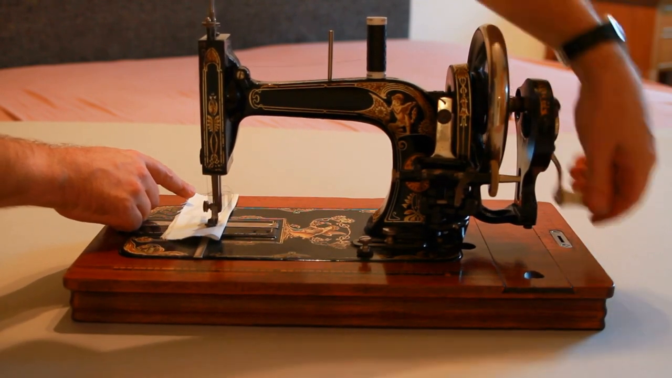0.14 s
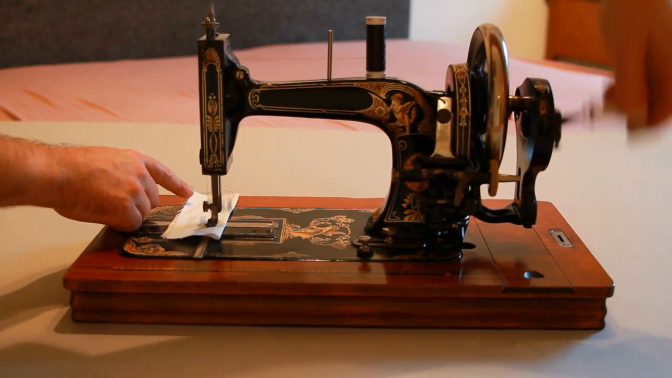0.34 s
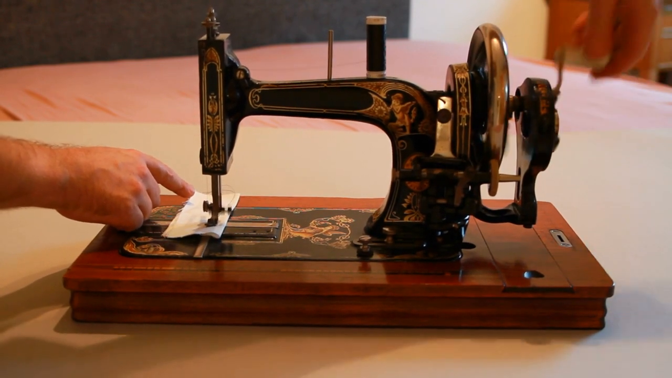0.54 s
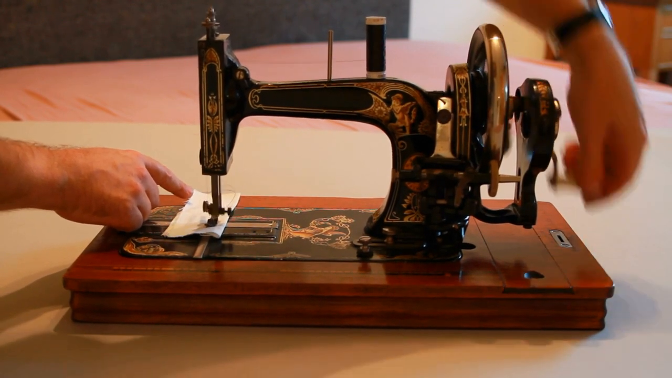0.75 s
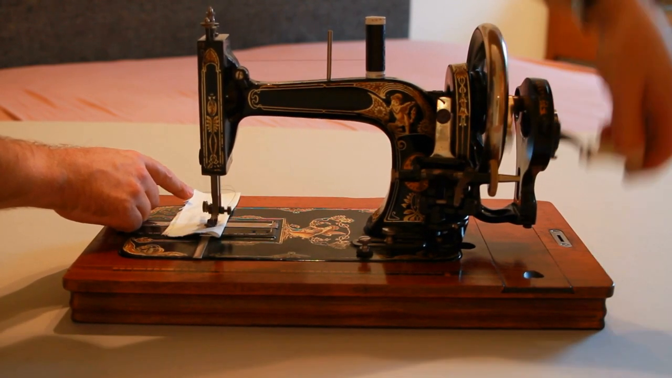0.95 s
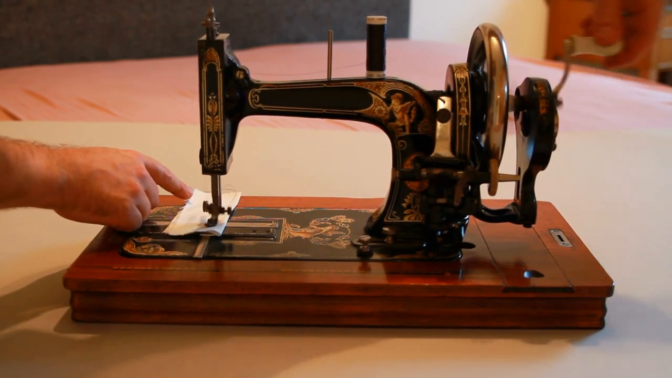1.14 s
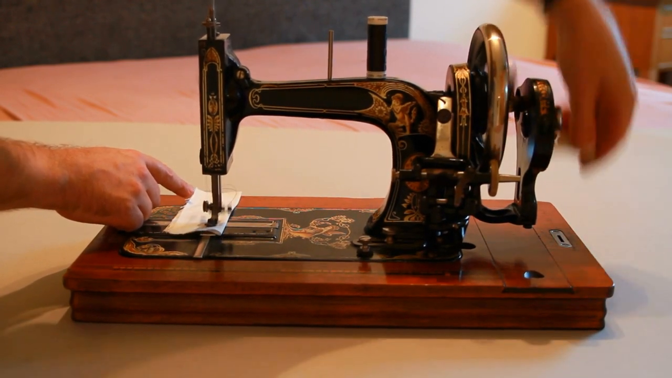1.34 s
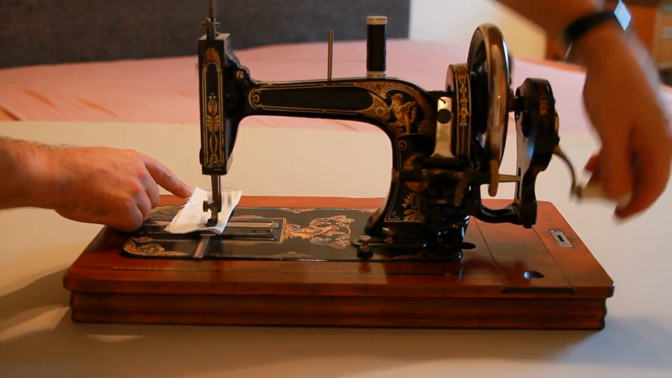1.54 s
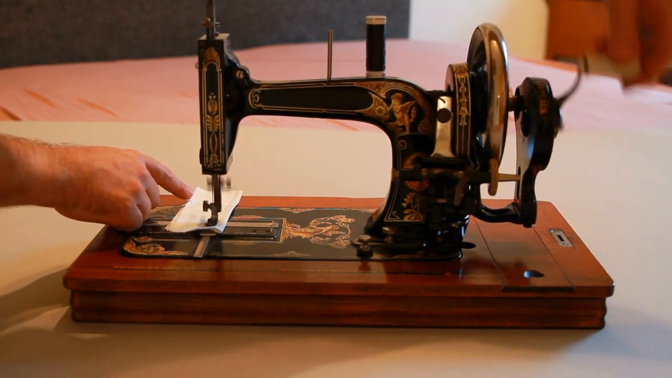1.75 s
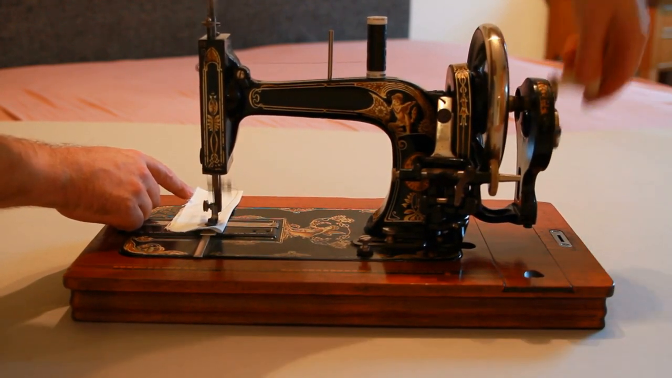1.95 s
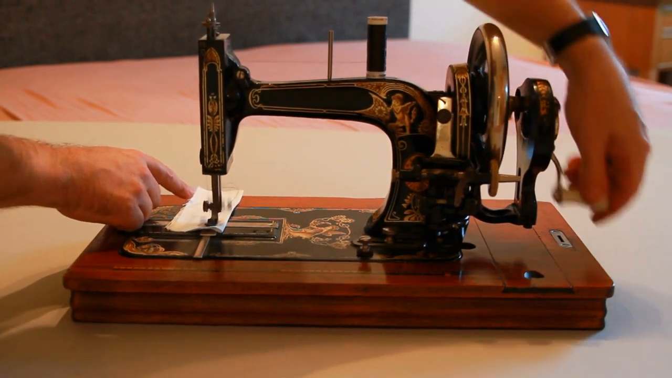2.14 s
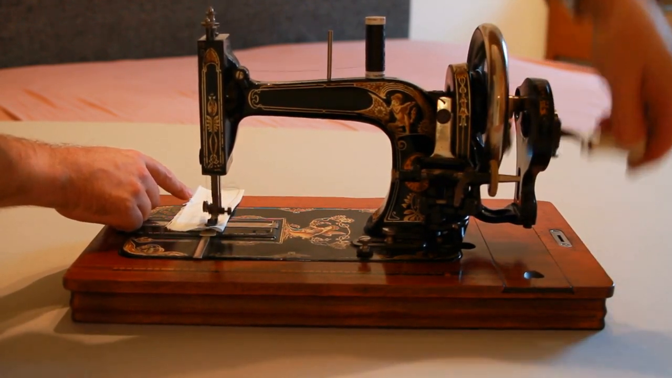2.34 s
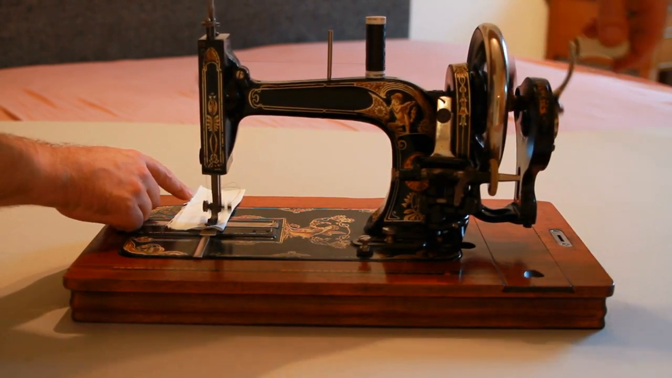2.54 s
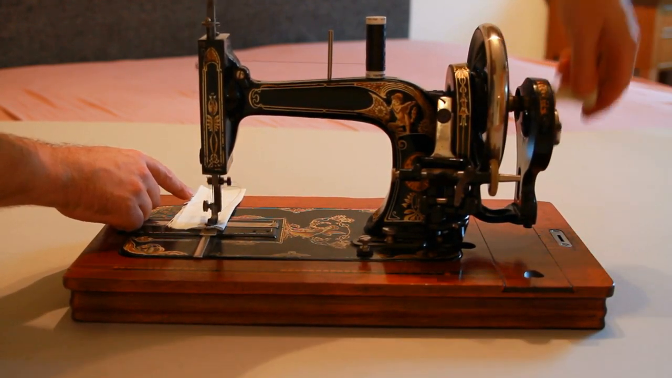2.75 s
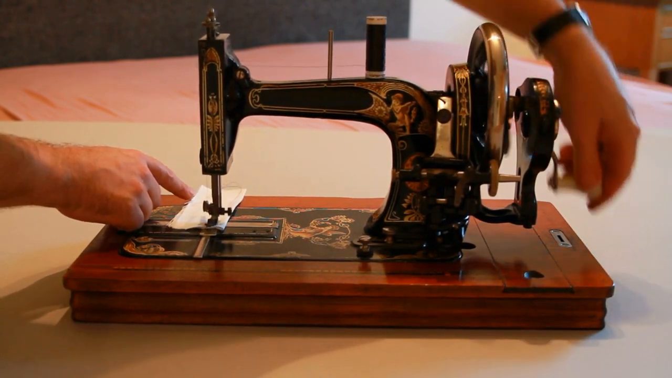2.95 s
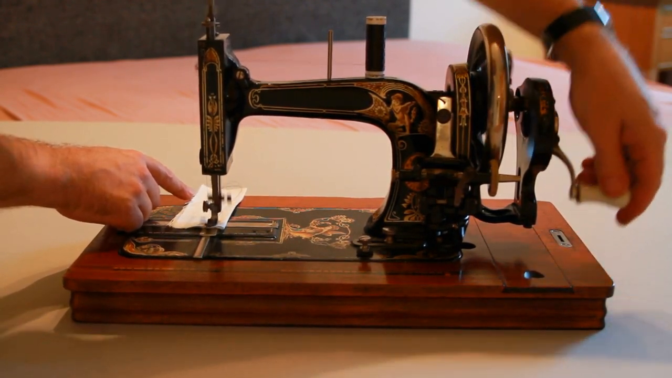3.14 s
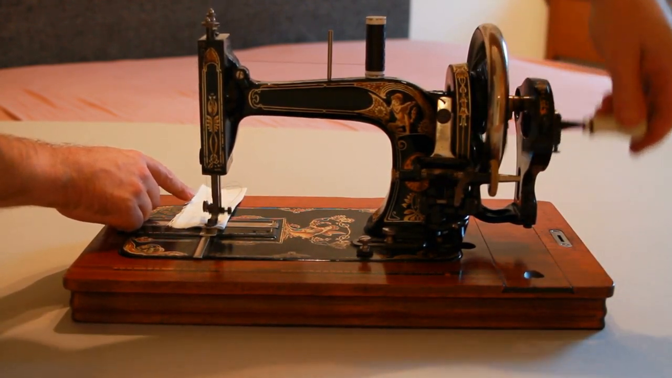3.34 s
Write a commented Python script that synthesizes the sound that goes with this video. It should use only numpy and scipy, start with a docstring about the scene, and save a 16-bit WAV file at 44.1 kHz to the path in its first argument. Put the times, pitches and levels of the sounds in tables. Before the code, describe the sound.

Close recording of an old sewing machine turned by hand, each stitch a soft tick then a bright snap-clack, over low wooden gear drumming; steady, then slowing, with short small-room reverberation.

```python
"""The drumming and whirr of crank gears open the scene, soon joined by the hits of a hand-cranked sewing machine
stitching cloth on a hollow wooden base in a small room, slowing towards the end. In each stitch small feed ticks,
a needle-bar snap, shuttle touches and clacks and loose rattles are short contacts that excite decaying modes.
Tooth blows excite the modes of the base; shaped noise gives the whirr of the iron frame and the table's rumble.
The hits are followed by a dense reverberant tail, and a faint hiss lies under everything."""
import sys
import numpy as np
from scipy import signal
from scipy.io import wavfile
from scipy.ndimage import uniform_filter1d

SR = 44100
rng = np.random.default_rng(int(sys.argv[2]) if len(sys.argv) > 2 else 0)


def boost_factor(decibels):
    """Convert a level in decibels to a linear amplitude factor."""
    exponent = np.asarray(decibels, float) / 20
    return 10 ** exponent


def log_audio(samples):
    """Write samples as a 16-bit WAV file to the path given in sys.argv[1]."""
    # one column per channel
    frames = np.atleast_2d(samples).T
    # limit to full scale, then quantise
    limited = np.clip(frames, -1, 1)
    pcm = np.round(limited * 32767).astype(np.int16)
    wavfile.write(sys.argv[1], SR, pcm)


N = 147735

# Needle-bar snaps. Each row: start in seconds, treble level in dB, body level in dB, both before the contact's trim.
NEEDLE_SNAPS = [(0.1144, -5, -19.5), (0.3189, -2.5, -20.5), (0.5356, -5.5, -22), (0.753, -3.5, -21),
                (0.9682, -6, -23.5), (1.189, -15, -46), (1.414, -3, -16), (1.6443, -15.5, -29),
                (1.8797, -2, -22), (2.1133, -6.5, -20), (2.359, -7, -23.5), (2.6357, -23, -32),
                (2.9446, -20, -35), (3.3111, -28, -34.5)]
# First touches of the shuttle. Each row: start in seconds, treble level in dB, body level in dB, before trim.
SHUTTLE_TOUCHES = [(.140, -14, -24), (.3445, -27, -23.5), (.5635, -18, -22.5), (.780, -16, -25),
                   (.9972, -12.5, -25.5), (1.2176, -24, -24), (1.6734, -22, -24.5), (1.9104, -12.5, -21),
                   (2.144, -18.5, -22), (2.3916, -9, -25), (2.6725, -15, -24.5), (2.991, -21, -36)]
# Clacks of the shuttle. Each row: start in seconds, treble level in dB, body level in dB, before trim.
SHUTTLE_CLACKS = [(0.152, -1, -18.5), (0.3564, -0.5, -20.5), (0.5753, -1.5, -19.5), (0.7901, -2, -18),
                  (1.0085, -2, -19.5), (1.2302, -1, -21), (1.4567, -14.5, -32), (1.6829, -1, -18.5),
                  (1.9235, -1.5, -21.5), (2.1559, -2, -20), (2.4034, -2, -17.5), (2.6862, -5.5, -19.5),
                  (3.0035, -9, -25.5)]
# Rattles of loose parts. Each row: start in seconds, treble level in dB, body level in dB, before trim.
LOOSE_RATTLES = [(.0742, -41, -38), (.2768, -36, -31.5), (.4998, -44, -37), (.7153, -47, -38),
                 (.9318, -40, -39), (.991, -20, -30), (1.2545, -16, -31), (1.6556, -16, -29),
                 (1.9031, -11.5, -26), (1.9165, -18, -22.5), (1.9355, -11, -31), (1.947, -17, -33),
                 (2.0727, -39, -43), (2.315, -37, -38), (2.381, -11, -26.5), (2.7844, -52, -43),
                 (2.7995, -39.5, -55), (2.9595, -24, -39), (2.976, -24, -39), (2.986, -23, -38),
                 (3.009, -9, -27), (3.018, -30, -27), (3.0265, -18, -37), (3.0295, -19, -39),
                 (3.037, -12, -24.5), (3.049, -22, -39), (3.259, -35, -39), (3.2984, -36, -41),
                 (3.3293, -30, -41), (3.3454, -30, -36)]
# Ticks of the cloth feed. Each row: start in seconds, body level in dB, treble level in dB, before trim.
FEED_TICKS = [(0.058, -32, -75), (0.087, -17.5, -39), (0.2646, -25, -39), (0.29, -15.5, -43),
              (0.479, -31, -38), (0.5076, -16.5, -31), (0.695, -29, -48), (0.7218, -20, -30),
              (0.9107, -28, -55), (0.9401, -18, -56), (1.133, -31, -47), (1.1584, -23, -36),
              (1.357, -30.5, -58), (1.384, -19.5, -29), (1.584, -32, -52), (1.6115, -16.5, -33),
              (1.8208, -24.5, -26), (1.8491, -18, -58), (2.0592, -45, -40), (2.083, -22.5, -41),
              (2.297, -33, -41), (2.322, -18, -53), (2.575, -34, -51), (2.582, -35, -45),
              (2.5945, -22, -28), (2.8843, -33, -32), (2.8973, -27, -29), (3.235, -31, -33),
              (3.2503, -37, -38)]

# How each kind of contact acts. Each holds: fade t60 in seconds, treble trim in dB, body trim in dB,
# mean delay of the rebound in seconds, mean level of the rebound in dB.
SNAP_CONTACT = (.013, 0, 7, .011, -17)
TOUCH_CONTACT = (.018, 2, 8, .0035, -4)
CLACK_CONTACT = (.016, -1, 9, .0125, -13)
RATTLE_CONTACT = (.011, 3, 9, .004, -13)
TICK_CONTACT = (.005, -3, 1.5, .006, -16)

# Modes of the iron frame. Each row: frequency in Hz, relative level in dB, t60 in seconds.
FRAME_MODES = [(1520, -12, 0.011), (2040, -14, 0.012), (2470, -9.5, 0.0074), (2865, -5, 0.0062),
               (3707, 4.5, 0.0034), (3824, 2, 0.0062), (4420, -1, 0.0044), (5030, -0.5, 0.0071),
               (5720, 0, 0.0039), (6310, -1, 0.005), (7100, -1, 0.0054), (8100, -2, 0.0044),
               (8830, 1, 0.0036), (9100, 0.5, 0.0058), (10530, -0.5, 0.0058), (11250, 2, 0.0028),
               (12420, 5, 0.0032), (12810, 2.5, 0.0032), (14450, 6.5, 0.003), (15380, -2, 0.0015),
               (15460, -10, 0.0023)]
# Modes of the feed parts. Each row: frequency in Hz, relative level in dB, t60 in seconds.
FEED_MODES = [(1291, -3, 0.023), (2130, -9.5, 0.012), (4340, 0.5, 0.0061), (4984, 0, 0.019),
              (5240, 3, 0.02), (6000, 1, 0.015)]
# Modes of the thin shuttle steel. Each row: frequency in Hz, level in dB relative to the clack, t60 in seconds.
SHUTTLE_MODES = [(9800, -35, 0.19), (10350, -19, 0.037), (6650, -45, 0.041)]
# Modes of the hollow wooden base. Each row: frequency in Hz, relative level in dB, t60 in seconds.
BASE_MODES = [(128, -15, 0.19), (165.7, -11.5, 0.13), (212.8, -4.5, 0.13), (257.5, -1.5, 0.11),
              (286.2, 1.5, 0.079), (326, 3, 0.097), (382.4, -2.5, 0.064), (448.5, -4, 0.093),
              (519.4, -8, 0.078), (593.6, -2.5, 0.059), (718.4, -8, 0.084), (782.6, -11, 0.13),
              (916, -13, 0.06)]
# Load on the gears. Each row: time in seconds, load in dB.
GEAR_LOAD = [(0.0, -33), (0.09, -32), (0.5, -35.5), (0.52, -33), (0.65, -36), (0.84, -31.5), (0.86, -36),
             (0.98, -33), (1.13, -41.5), (1.18, -34), (1.21, -35.5), (1.37, -35.5), (1.4, -37),
             (1.73, -34.5), (1.81, -37), (1.93, -32.5), (2.01, -40), (2.15, -32), (2.3, -38.5), (2.33, -34),
             (2.54, -39.5), (2.74, -36), (2.85, -43.5), (2.89, -38), (3.06, -37), (3.21, -44),
             (3.25, -37.5), (3.35, -43)]
# Spectrum of the gear whirr. Each row: frequency in Hz, relative density in dB per Hz.
WHIRR_SPECTRUM = [(410, -30), (700, -6), (997, -1.5), (1440, 0), (2880, -7.5), (4990, -8.5), (6400, -16),
                  (13500, -17), (15500, -22), (16500, -50)]
# Spectrum of the table's rumble. Each row: frequency in Hz, relative density in dB per Hz.
TABLE_SPECTRUM = [(13, -54), (22, -18), (54, -12), (75, -19), (108, 8), (140, 15), (180, -30), (310, -120)]
# Decay of the room. Each row: frequency in Hz, t60 in seconds.
ROOM_DECAY = [(1000, 0.66), (2500, 0.27), (5500, 0.24), (10000, 0.21), (15000, 0.12)]

FRAME_SPLIT_HZ = 6500  # modes above it are treble, the others body


def rms_one(x):
    """Normalisation: scaling to unit rms lets a level in dB be set afterwards."""
    return x / np.sqrt(np.mean(x ** 2) + 1e-20)


def at_hz(points, hz):
    """Pitch scale: a table of frequencies is interpolated on a logarithmic axis."""
    table_hz, values = np.transpose(points)
    return np.interp(np.log(hz), np.log(table_hz), values)


def ring(x, hz, t60):
    """Damped resonance: a two-pole filter answers a unit click with a decaying sine that starts at height 1."""
    radius = boost_factor(-60 / (max(t60, .002) * SR))
    angle = 2 * np.pi * min(hz, .45 * SR) / SR
    return signal.lfilter([0, np.sin(angle)], [1, -2 * radius * np.cos(angle), radius ** 2], x + 1e-18)


def band(x, low_hz, high_hz):
    """Band limitation: a Butterworth band-pass isolates one part of the spectrum."""
    return signal.sosfilt(signal.butter(2, [low_hz, high_hz], "band", fs=SR, output="sos"), x)


def high_pass(x, order, low_hz):
    """Low cut: a Butterworth high-pass removes what lies under low_hz."""
    return signal.sosfilt(signal.butter(order, low_hz, "high", fs=SR, output="sos"), x)


def wander(rate_hz):
    """Random modulation: straight lines join normal draws of spread 1, two per period of rate_hz."""
    steps = rng.standard_normal(200)
    return np.interp(np.arange(N) / SR * 2 * rate_hz, np.arange(len(steps)), steps)


def contact_force(count, contact, t, luck):
    """Impact excitation: one strong blow, then a fading chatter of contacts, a rebound and trembling loose play."""
    fade_s, _, _, rebound_s, rebound_db = contact
    rise_s, impact_db = .0002, 15
    rebound_scatter_s, rebound_scatter_db = .001, 3
    after_db, after_t60_s, after_grain_db = -20, .15, 3

    def burst(u):
        return (u > 0) * (1 - np.exp(-abs(u) / rise_s)) * boost_factor(-60 * abs(u) / fade_s)

    noise, grain = rng.standard_normal((2, count, len(t)))
    grain = rms_one(uniform_filter1d(grain, size=40))
    trembling = boost_factor(after_db - 60 * t / after_t60_s + after_grain_db * grain)
    rebound_start = rebound_s + rebound_scatter_s * luck[:, 1:2]
    rebound = boost_factor(rebound_db + rebound_scatter_db * luck[:, :1]) * burst(t - rebound_start)
    force = (burst(t) + rebound + trembling) * noise
    force[:, 1] = boost_factor(impact_db)  # the first blow stands over the chatter
    return force


def strike(events, contact, modes):
    """Modal superposition: each hit rings every mode, with strengths and a slight lowering of pitch of its own."""
    mode_scatter_db, detune_share = 2.0, .04
    treble_trim_db, body_trim_db = contact[1:3]
    t = np.arange(SR // 12) / SR
    luck = rng.standard_normal((len(events), 3))
    force = contact_force(len(events), contact, t, luck)
    scatter_db = mode_scatter_db * rng.standard_normal((len(events), len(modes)))
    groups = np.zeros((2,) + force.shape)  # body, treble
    for k, (hz, level_db, t60) in enumerate(modes):
        strength = (-1) ** k * boost_factor(level_db + scatter_db[:, k:k + 1])
        groups[int(hz > FRAME_SPLIT_HZ)] += strength * ring(force, hz, t60)
    # take three times the highest short-term rms as the peak of each group
    short_rms = np.sqrt(uniform_filter1d(groups ** 2, size=100).max(axis=2, keepdims=True))
    body, treble = groups / (3 * short_rms + 1e-12)
    out = np.zeros(N + SR)
    for k, (s, treble_db, body_db) in enumerate(events):
        hit = boost_factor(treble_db + treble_trim_db) * treble[k] + boost_factor(body_db + body_trim_db) * body[k]
        # stretching in time lowers the modes
        stretched = signal.resample(hit, int(len(t) * (1 + detune_share * abs(luck[k, 2]))))
        start = int(s * SR)
        out[start:start + len(t)] += stretched[:len(t)]
    return out[:N]


def shuttle_steel():
    """Free vibration: one click per clack sets the thin steel singing."""
    clicks = np.zeros(N)
    for s, treble_db, _ in SHUTTLE_CLACKS:
        clicks[int(s * SR)] = boost_factor(treble_db)
    return sum(boost_factor(db) * ring(clicks, hz, t60) for hz, db, t60 in SHUTTLE_MODES)


def linkage():
    """Shared resonator: snaps, touches, clacks and rattles all excite the modes of the iron frame."""
    kinds = ((NEEDLE_SNAPS, SNAP_CONTACT), (SHUTTLE_TOUCHES, TOUCH_CONTACT),
             (SHUTTLE_CLACKS, CLACK_CONTACT), (LOOSE_RATTLES, RATTLE_CONTACT))
    return sum(strike(events, contact, FRAME_MODES) for events, contact in kinds) + shuttle_steel()


def feed():
    """Coupled resonators: the ticks ring the feed parts and the treble modes of the frame."""
    events = [(s, treble_db, body_db) for s, body_db, treble_db in FEED_TICKS]
    treble_modes = [mode for mode in FRAME_MODES if mode[0] > FRAME_SPLIT_HZ]
    return strike(events, TICK_CONTACT, list(FEED_MODES) + treble_modes)


def stitch_turns():
    """Rotation: the shaft's phase advances by one turn from each snap to the next."""
    s = np.array(NEEDLE_SNAPS)[:, 0]
    s = np.r_[2 * s[0] - s[1], s, 2 * s[-1] - s[-2]]  # one more stitch at either end
    return np.interp(np.arange(N) / SR, s, np.arange(len(s)))


def tooth_blows(turns):
    """Gear meshing: evenly spaced tooth contacts join random blows of loose play, each of random sign."""
    teeth_per_stitch, loose_per_s, scatter_db = 17, 1200, 1.5
    meshing = np.diff(np.floor(turns * teeth_per_stitch), prepend=0) > 0
    loose = rng.random(N) < loose_per_s / SR
    return (meshing | loose) * boost_factor(scatter_db * rng.standard_normal(N)) * rng.choice([-1, 1], N)


def base_drum(turns, load_db):
    """Forced vibration: tooth blows drive each mode of the base unevenly, its upper modes swelling every stitch."""
    trim_db, low_cut_hz = 0.44, 89.5
    upper_hz, upper_swell_db, upper_peak_turn = 420, 2, 0.037
    drive_wander_db, drive_wander_hz = 3, 8
    blows = tooth_blows(turns)
    steady = sum((-1) ** k * boost_factor(db) * ring(blows, hz, t60) for k, (hz, db, t60) in enumerate(BASE_MODES))
    # the load sets the level relative to a steady drum of unit rms
    push = boost_factor(load_db + trim_db) * blows / np.sqrt(np.mean(steady ** 2))
    upper_push = push * boost_factor(upper_swell_db * np.cos(2 * np.pi * (turns - upper_peak_turn)))
    drum = np.zeros(N)
    for k, (hz, db, t60) in enumerate(BASE_MODES):
        drive = upper_push if hz > upper_hz else push
        drive = drive * boost_factor(drive_wander_db * wander(drive_wander_hz))
        drum += (-1) ** k * boost_factor(db) * ring(drive, hz, t60)
    return high_pass(drum, 2, low_cut_hz)


def shaped_noise(sources, edges, spectrum):
    """Spectral shaping: two noises take turns in neighbouring bands, weighted by the wanted density."""
    return sum(boost_factor(at_hz(spectrum, np.sqrt(low * high))) * band(sources[k % 2], low, high)
               for k, (low, high) in enumerate(zip(edges, edges[1:])))


def frame_whirr(turns, load_db):
    """Granular friction: noise of uneven grains follows the load, swells once a stitch and flutters."""
    mean_level_db, grain_db = -43.5, 6
    swell_db, swell_peak_turn = 1, 0.88
    flutter_db, flutter_hz = 2, 21.8
    grain_size = np.minimum(rng.exponential(1, (2, N)), 4)
    grains = rng.standard_normal((2, N)) * boost_factor(grain_db * grain_size)
    third_octaves = 700 * 2 ** np.arange(0, 4.8, 1 / 3)
    whirr = rms_one(shaped_noise(grains, third_octaves, WHIRR_SPECTRUM))
    swell = swell_db * np.cos(2 * np.pi * (turns - swell_peak_turn))
    level_db = mean_level_db + load_db - load_db.mean() + swell + flutter_db * wander(flutter_hz)
    return boost_factor(level_db) * whirr


def table_rumble(load_db):
    """Low-frequency radiation: third-octave bands of noise grow with the load on the gears."""
    mean_level_db = -55
    white = rng.standard_normal((2, N + SR))
    third_octaves = 20 * 2 ** np.arange(0, 3, 1 / 3)
    low = shaped_noise(white, third_octaves, TABLE_SPECTRUM)[SR:]  # the filters settle for a second
    return boost_factor(mean_level_db + load_db - load_db.mean()) * rms_one(low)


def gears():
    """Common drive: one rotation and one load govern base and whirr, and the load also governs the table."""
    turns = stitch_turns()
    load_db = np.interp(np.arange(N) / SR, *np.transpose(GEAR_LOAD))
    return base_drum(turns, load_db) + table_rumble(load_db) + frame_whirr(turns, load_db)


def room(x):
    """Reverberation: dense echoes are noise that builds up briefly, then decays at its own rate in each band."""
    level_db, build_up_s = -8, 0.0053
    t = np.arange(SR // 2) / SR
    edges = 500 * 2 ** np.arange(0, 5.3, .5)  # half octaves, Hz
    white = rng.standard_normal((2, len(t)))
    tail = np.zeros(len(t))
    for k, (low, high) in enumerate(zip(edges, edges[1:])):
        t60 = at_hz(ROOM_DECAY, np.sqrt(low * high))
        tail += band(white[k % 2], low, high) * boost_factor(-60 * t / t60)
    tail *= 1 - np.exp(-t / build_up_s)
    return boost_factor(level_db) * signal.fftconvolve(x, tail / np.sqrt(np.sum(tail ** 2)))[:N]


def scene():
    """Superposition: the hits, cut below 700 Hz, and their reverberation add to the gears."""
    hits = high_pass(linkage() + feed(), 2, 700)
    return (hits + room(hits) + gears())[None]


def roll_off(x):
    """The treble ends steeply here."""
    return signal.sosfilt(signal.butter(12, 16970, fs=SR, output="sos"), x)


def record(dry):
    """Transducer limits: a faint noise floor is added, then both ends of the spectrum are cut."""
    hiss_db, low_cut_hz, top_cut_hz = -78, 13, 17300
    x = dry + boost_factor(hiss_db) * rng.standard_normal(dry.shape)
    x = high_pass(x, 3, low_cut_hz)
    x = signal.sosfilt(signal.cheby2(12, 70, top_cut_hz, fs=SR, output="sos"), x)
    return roll_off(x)


dry = scene()
out = record(dry)
log_audio(out)
```